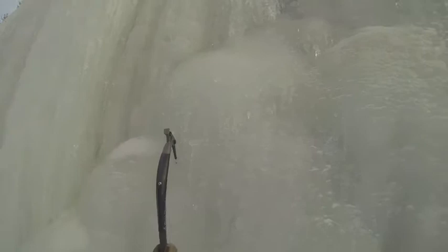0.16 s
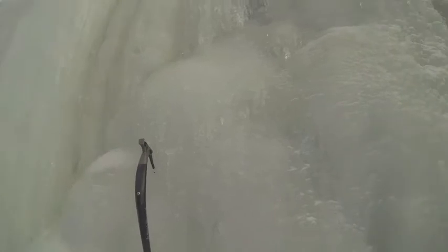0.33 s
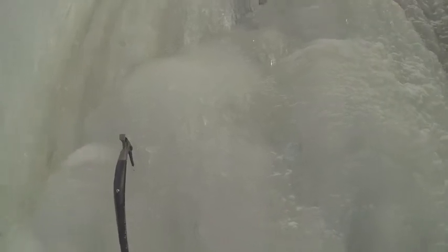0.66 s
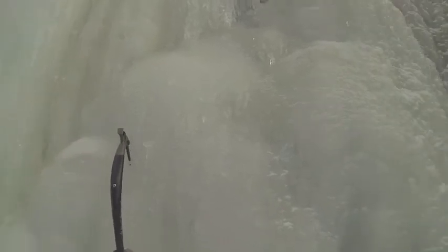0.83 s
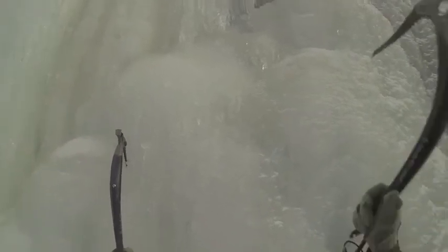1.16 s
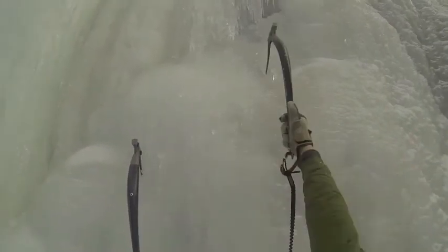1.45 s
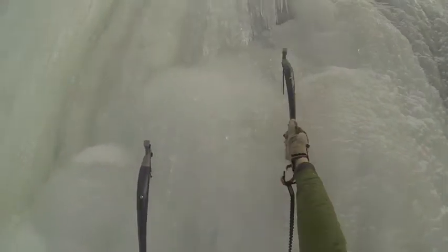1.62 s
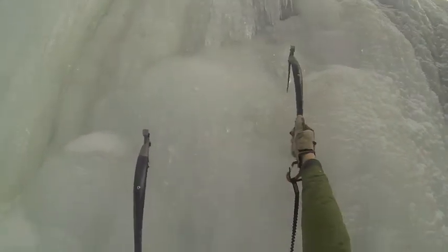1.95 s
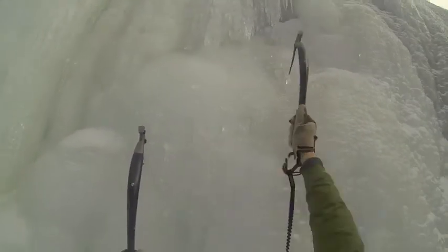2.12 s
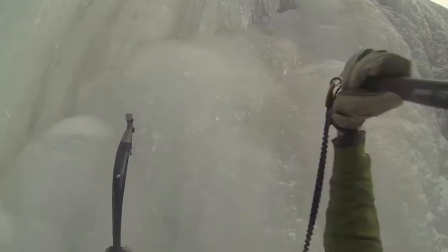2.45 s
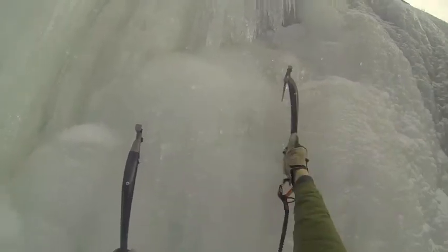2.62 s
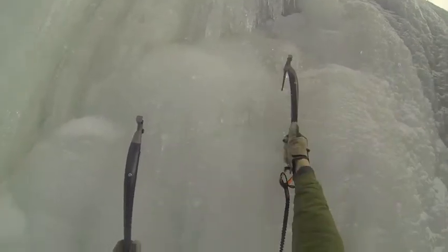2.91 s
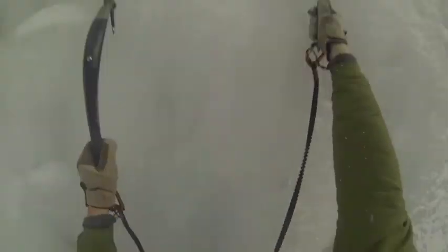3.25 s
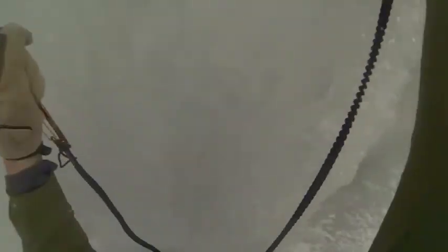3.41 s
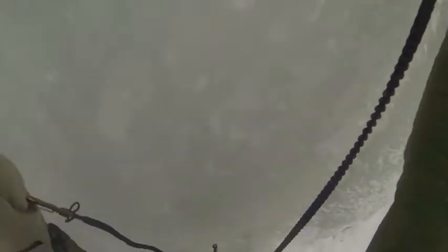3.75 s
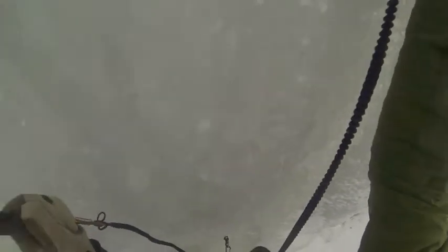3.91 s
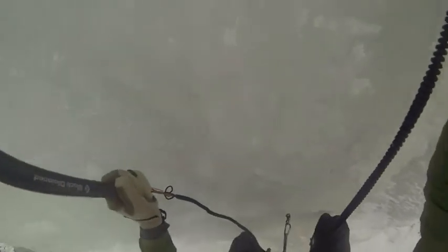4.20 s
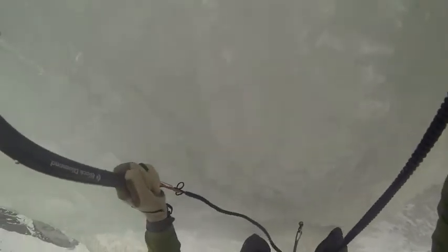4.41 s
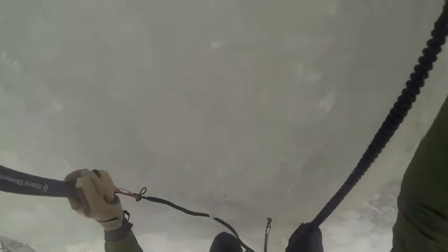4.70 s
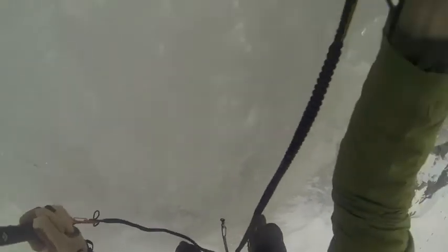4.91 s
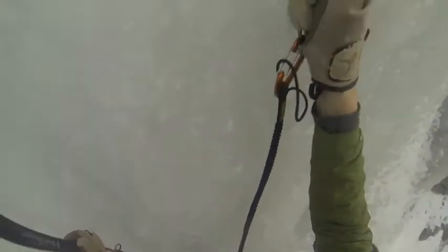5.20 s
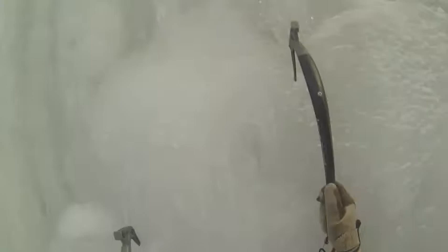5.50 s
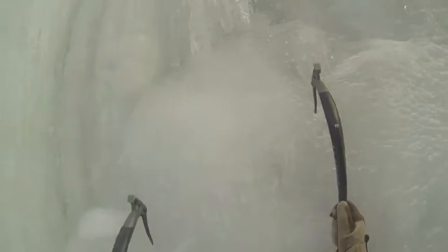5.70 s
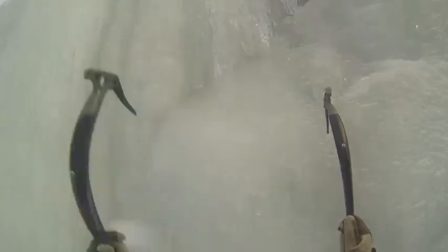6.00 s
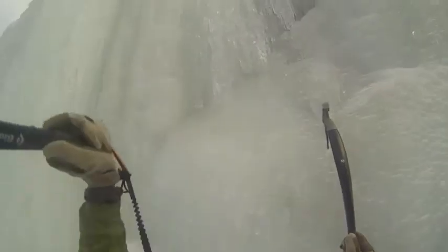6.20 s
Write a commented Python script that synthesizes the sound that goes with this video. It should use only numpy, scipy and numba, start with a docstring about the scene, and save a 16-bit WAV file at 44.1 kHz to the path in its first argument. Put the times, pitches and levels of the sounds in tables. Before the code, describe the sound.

Muffled hollow water hiss inside a helmet case, with crunching ice, small metal clinks, one sharp ringing ice tool blow, then cloth rustles and dull boot knocks.

```python
"""Ice climber on a frozen waterfall

Heard from inside a closed plastic case on the helmet. Running water is shaped noise: it hisses and rings the case.
Crampons crunch in runs of tiny cracks, and metal parts clink with a tick and a short ring.
One ice tool taps lightly, then is driven home with cracks and a ringing knock. Boots knock as decaying noise.
The jacket rustles in tiny creases, sleeves and harness rub as shaped noise, and the moving helmet rumbles.
"""
import sys
import numpy as np
from scipy import signal
from scipy.fft import rfft, irfft, next_fast_len
from scipy.io import wavfile
from numba import njit

SR = 44100
rng = np.random.default_rng(int(sys.argv[2]) if len(sys.argv) > 2 else 0)


def inscribe(sig):
    """Save sig as 16-bit PCM at rate SR to the path in sys.argv[1].

    A 1-D sig is mono; a 2-D sig holds one channel per row.
    Samples are clipped to [-1, 1] before scaling.
    """
    pcm = np.round(np.clip(np.atleast_2d(sig).T, -1, 1) * 32767)
    wavfile.write(sys.argv[1], SR, pcm.astype(np.int16))


N = 280476
T = np.arange(N) / SR  # time in seconds

# In the tables, t60 is the time to fall by 60 dB.
# Spectra give only a colour; the loudness is set separately.

# the water rings the hollow of the case; its level and pitch drift separately as the head turns:
# (t/s, base level/dB, centre f/Hz)
CASE_RING_PATH = [(0, -35, 1564), (0.6, -34, 1538), (1.35, -30.0, 1546), (1.95, -34.5, 1570),
                  (2.2, -35.5, 1565), (2.75, -34, 1635), (3.13, -35.5, 1626), (3.3, -36.5, 1510),
                  (3.7, -38, 1515), (4.4, -38.5, 1492), (5.2, -39, 1512), (5.6, -33, 1480),
                  (6.1, -31, 1466), (6.36, -32.5, 1474)]
# level of the open rush of the water: (t/s, level/dB)
RUSH_LEVEL_PATH = [(0, -53), (0.7, -54), (1.3, -52), (2.75, -48), (3.45, -48), (4.2, -51), (4.85, -54),
                   (5.55, -48.5), (6.36, -50.5)]
# spectrum of the rush of the water outside the ring: (f/Hz, relative level per Hz/dB)
RUSH_SPECTRUM = [(160, -10.5), (520, -6), (760, -4), (935, 2.5), (1000, -5), (1075, 2), (1750, 4),
                 (2040, -6.5), (2320, 0), (2720, -8), (2990, -6), (3280, -14), (3460, -19.5), (4600, -30.5)]
# spectrum of the even hiss behind everything: (f/Hz, relative level per Hz/dB)
FAR_HISS_SPECTRUM = [(100, 15), (1000, 13), (4000, 6), (5000, 5), (6500, 0), (9500, -2), (10600, -6),
                     (11300, -3), (12000, -8), (13200, -8), (15000, -14)]
FAR_HISS_DB = -67
# the main ring lies here and follows a share of each shift of the centre
MAIN_HZ, MAIN_FOLLOWS = 1551.5, 0.31
# as the centre drops, energy passes from the main ring to the lower one
MAIN_DB, MAIN_DB_PER_HZ = -0.86, 0.0442
LOWER_DB, LOWER_DB_PER_HZ = -8.5, -0.0434
# unevenness of the splashing water: steps per second, spread in dB
SPLASH_HZ, SPLASH_DB = 29.87, 1.16

# the climber shifts weight: (start t/s, length/s, helmet rumble level/dB, body and harness level/dB)
WEIGHT_SHIFTS = [(0.153, 0.13, -31, -63.5), (0.422, 0.14, -27.5, -53), (0.797, 0.065, -32, -66),
                 (2.598, 0.26, -31.5, -54), (3.117, 0.31, -45.5, -49.5), (3.582, 0.37, -29, -51.5),
                 (3.954, 0.39, -36, -59), (4.703, 0.18, -63, -63), (5.182, 0.59, -39.5, -55.5)]
SHIFT_ATTACK_S, SHIFT_RELEASE_S = 0.1, 0.068
STILL_RUMBLE_DB, STILL_BODY_DB = -40, -61  # while hanging still
# spectrum of the helmet rumble: (f/Hz, relative level per Hz/dB)
RUMBLE_SPECTRUM = [(3, -9.5), (8, 14.5), (13, 18.5), (17, 17.5), (23, -10), (36, 4), (50, -8), (72, -15.5),
                   (150, -43.5)]
# spectrum of the body and harness: (f/Hz, relative level per Hz/dB)
BODY_SPECTRUM = [(60, -23), (78, -8.5), (97, 0.5), (113, 0), (135, -15), (155, -11.5), (220, -23.5),
                 (500, -42.5)]
# the sleeves rub: (start t/s, length/s, level/dB)
SLEEVE_RUBS = [(2.65, 0.41, -66.5), (3.08, 0.067, -58.5), (3.55, 1.79, -59), (4.25, 0.44, -58)]
RUB_ATTACK_S, RUB_RELEASE_S, STILL_SLEEVE_DB = 0.082, 0.1, -71.5
# spectrum of the sleeves: (f/Hz, relative level per Hz/dB)
SLEEVE_SPECTRUM = [(140, 5), (240, 2), (310, 7.5), (400, -5), (700, -45.5), (1500, -41.5)]
# unevenness of harness and sleeves: steps per second, spread in dB
RUB_FLICKER_HZ, RUB_FLICKER_DB = 14, 2

# steel points crunch in the ice: (t/s, level before the walls/dB, t60/s, treble tilt/dB per octave)
POINT_CRUNCHES = [(0.132, -49, .05, 2.5), (.172, -36.5, .07, 0.5), (.198, -44, 0.029, 3.5),
                  (.225, -51, .05, 1), (.353, -56, 0.034, 4), (0.399, -43.5, 0.026, -1),
                  (0.441, -35.5, 0.05, 2), (0.474, -38.5, 0.064, -0.5), (.501, -44, 0.037, 3.5),
                  (.529, -66, 0.069, -3), (.712, -41, 0.072, 6), (0.725, -47, 0.034, 5),
                  (0.84, -42.5, 0.038, -2), (3.238, -43, 0.097, -8), (3.323, -40.5, 0.056, -7.5),
                  (4.236, -50.5, 0.11, 2.5), (4.258, -38.5, 0.05, -10), (4.774, -61, 0.11, 10),
                  (5.089, -56, 0.054, 20), (5.164, -57.5, .07, 18)]
# a loaded crampon grinds off crumbs of ice: (start t/s, length/s, middle level before the walls/dB)
CRAMPON_GRINDS = [(0.409, .12, -50), (0.812, .13, -68), (5.568, .14, -62.5)]
CRUMBS_PER_S, CRUMB_SPREAD_DB = 55, 5
CRUMB_T60_S, CRUMB_TILT_DB = 0.028, 1.5  # tilt per octave
# spectrum of cracking ice, before tilting: (f/Hz, relative level per Hz/dB)
CRACK_SPECTRUM = [(310, -48.5), (610, -22.5), (1520, 12), (2250, 6.5), (3280, 3), (3760, -3.5), (4420, -4),
                  (5320, -3), (5960, -5), (6620, -9), (7520, -11.5), (10100, -18), (11400, -24.5),
                  (12900, -26.5), (14800, -29.5)]
# the walls of the case ring with cracks and taps: (f/Hz, width/Hz, level/dB)
CASE_WALL_MODES = [(3020, 90, -0.5), (3330, 80, 3.5), (4050, 120, 1.5), (4930, 190, -1), (5310, 110, 3),
                   (6560, 70, 4.5), (7240, 47, 0.5), (7800, 130, 4.5), (8270, 140, -2)]
WALL_DIRECT_DB = -4

# the stiff jacket slides and creases: (start t/s, length/s, level/dB)
JACKET_RUSTLES = [(.16, 0.5, -80), (3.25, 0.55, -66), (3.85, 1.54, -76.5), (5.62, 0.069, -72)]
RUSTLE_ATTACK_S, RUSTLE_RELEASE_S = 0.08, 0.053
# spectrum of the sliding cloth: (f/Hz, relative level per Hz/dB)
SLIDE_SPECTRUM = [(1500, -12), (3100, -3), (4200, -3), (5200, -2), (6500, -1), (9000, 0), (11000, 1),
                  (12400, -6), (14800, -11)]
CREASES_PER_S, CREASE_SPREAD_DB = 200, 20
CREASE_T60_S, CREASE_TILT_DB = 0.013, 8  # each crease takes 0.5 to 1.5 times these
SLIDE_DB = -10.5  # against the creases

# clips, buckles and screws touch: (t/s, tick level/dB, ring f/Hz, ring against tick/dB, tick tilt/dB per octave)
METAL_CLINKS = [(1.256, -41, 4840, -2, 1.5), (1.694, -54, 4950, -6, 2), (2.373, -35.5, 4300, -5.5, 3.5),
                (2.533, -42.5, 5160, -3.5, 3), (2.579, -37, 5150, -5.5, 1.5), (2.609, -39, 8300, -17, 12),
                (2.899, -58, 6420, -8, 16.5), (3.208, -47.5, 5660, -11, 6), (3.272, -36.5, 2870, 4.5, -2),
                (3.289, -59, 7940, -15, 8), (3.368, -61, 7900, -16, 13), (3.392, -55, 7400, -8, 8),
                (3.409, -49, 6640, 3, -1), (3.431, -52, 7950, -15, 5), (3.482, -29.5, 3130, 4.5, 2),
                (3.599, -50, 8040, -13, 0), (3.668, -56, 7900, -9, 11), (3.732, -47, 5150, -9, 1),
                (3.74, -51, 10900, -13, 7), (3.976, -57, 8000, -16, 12), (4.346, -53, 8400, -9, 3),
                (4.692, -59, 9800, -10, 10)]
# close modes of a clip and its gate: (frequency ratio, gain; both plain numbers)
METAL_MODES = [(.87, .45), (.94, -.6), (1, 1), (1.07, -.7), (1.15, .45)]
CLINK_TICK_T60_S, CLINK_RING_T60_S = 0.019, 0.024

# the pick is first set lightly on the ice and skips once: (t/s, level before the walls/dB)
PICK_TAPS = [(1.586, -38), (1.589, -33)]
# what the lightly held tool rings with: (f/Hz, relative level/dB, t60/s)
TAP_MODES = [(2265, 2, 0.048), (3130, -10, 0.049), (3560, -22, 0.044), (4120, -22, 0.028),
             (4425, -18, 0.055), (4870, -9.5, 0.025), (7564, -40, 0.073), (8100, -28, 0.033),
             (9948, -16, 0.039)]
TAP_RING_DB = 0.5  # added to the mode levels
TAP_CRACK_T60_S, TAP_TILT_DB = 0.04, -3  # tilt per octave

# the pick bites, drives in and splits off chips:
# (t/s, level before the filter and walls/dB, t60/s, tilt/dB per octave)
BLOW_CRACKS = [(2.6, -36, 0.044, 2), (2.6095, -18.5, 0.011, 3), (2.6113, -13, 0.047, -4.5),
               (2.616, -28, 0.014, 24), (2.624, -38, 0.019, 17), (2.626, -47, .035, 2)]
CRACK_LOW_HZ = 1900
# what the blow rings: (f/Hz, relative level/dB)
BLOW_MODES = [(595, -23), (949, -14), (1075, -13.5), (1445, 0), (1690, -3), (1850, -5), (2150, -16),
              (2555, -14), (2990, -13), (3350, -12), (4800, -20), (5300, -20), (6590, -18), (7500, -21)]
BLOW_S, BLOW_DB, BLOW_PUSH_S, BLOW_T60_S = 2.6115, -11, 0.0015, 0.04

# jolts carried through the body to the helmet: (t/s, level/dB, pitch f/Hz, length/s)
HELMET_JOLTS = [(2.636, -25.5, 46, 0.032), (4.25, -24, 64, 0.06), (4.296, -23.5, 21.7, 0.073),
                (4.702, -44, 90, 0.035), (5.184, -24.5, 44.4, 0.037), (5.205, -20.5, 14.7, .1),
                (5.686, -36, 34, 0.074)]

# a boot kicks or nudges the ice and the knock comes up through the body: (t/s, level/dB, t60/s)
BOOT_KICKS = [(4.239, -33.5, 0.3), (4.69, -48, .15), (5.16, -40.5, .4)]
KICK_ATTACK_S = 0.0099
# spectrum of the boot knock: (f/Hz, relative level per Hz/dB)
KNOCK_SPECTRUM = [(60, -13), (105, 12), (150, -11), (220, -16), (330, -22), (620, -23), (1000, -21)]


def amp(db):
    """Turn decibels into a gain."""
    return 10 ** (np.asarray(db) / 20)


def unit(x):
    """Scale a sound to an rms of 1."""
    return x / np.sqrt(np.mean(x ** 2))


def curves(rows):
    """Draw one line in time for each column of a table."""
    s, *columns = np.transpose(rows)
    return [np.interp(T, s, column) for column in columns]


def add(out, s, sound):
    """Mix a sound in at a time in seconds."""
    i = int(s * SR)
    out[i:i + len(sound)] += sound[:N - i]


def fade(t, t60):
    """Die away exponentially, by 60 dB in t60 seconds."""
    return np.exp(-np.log(1000) * t / t60)


def flicker(hz, db):
    """A gain that wanders at random, with hz new steps a second."""
    steps = rng.standard_normal(size=1024)
    return amp(db * np.interp(T * hz, np.arange(len(steps)), steps))


def moves(rows, attack_s, release_s):
    """Gain of a series of movements: each swells, holds and dies away; their powers add."""
    power = np.zeros(N)
    for s, length, db in rows:
        corners = [s - attack_s, s, s + length, s + length + release_s]
        power += (amp(db) * np.interp(T, corners, [0, 1, 1, 0])) ** 2
    return np.sqrt(power)


def gain_db(points, hz):
    """Read a spectrum on a log-frequency axis; it falls steeply beyond its last point."""
    f, db = np.transpose(points)
    octave = np.log2(hz + 1)
    beyond = np.maximum(octave - np.log2(f[-1]), 0)
    return np.interp(octave, np.log2(f), db) - 36 * beyond


def noise(points):
    """Noise coloured by a spectrum, at an rms of 1."""
    size = next_fast_len(N)
    gain = amp(gain_db(points, np.fft.rfftfreq(size, 1 / SR)))
    white = rng.standard_normal(N)
    return unit(irfft(rfft(white, size) * gain, size)[:N])


def response(points, tilt_db, size=512):
    """A short click with a tilted spectrum, its energy as early as possible and equal to 1."""
    hz = np.fft.rfftfreq(size, 1 / SR)
    db = gain_db(points, hz) + tilt_db * np.log2(np.clip(hz, 2000, 9000) / 5000)
    # folding the cepstrum (the spectrum of the log spectrum) gives minimum phase
    cepstrum = irfft(np.log(amp(db)))
    cepstrum[1:size // 2] *= 2
    cepstrum[size // 2 + 1:] = 0
    click = irfft(np.exp(rfft(cepstrum)))
    return click / np.linalg.norm(click)


@njit
def resonate(x, hz, width):
    """State-variable band-pass whose centre may move."""
    y, band, low = np.empty(len(x)), 0., 0.
    for i in range(len(x)):
        g, k = np.tan(np.pi * hz[i] / SR), width / hz[i]
        v = (band + g * (x[i] - low)) / (1 + g * (g + k))
        band, low, y[i] = 2 * v - band, low + 2 * g * v, k * v
    return y


def ring(hz, width_hz, skirt_hz):
    """Noise in a narrow resonance, its skirts cut by a wider one."""
    centre = hz + np.zeros(N)
    narrow = resonate(rng.standard_normal(N), centre, float(width_hz))
    return unit(resonate(narrow, centre, float(skirt_hz)))


def fracture(t60, tilt_db):
    """A dying run of tiny cracks of uneven size, coloured by the ice spectrum."""
    t = T[:SR // 8]
    envelope = fade(t, t60)
    cracks = rng.standard_normal(len(t)) * rng.exponential(size=len(t)) * envelope
    burst = signal.fftconvolve(cracks, response(CRACK_SPECTRUM, tilt_db))[:len(t)]
    # give the burst the same energy as its envelope
    return burst * np.linalg.norm(envelope) / np.linalg.norm(burst)


def walls(x):
    """Sharp sounds reach the inside of the case partly straight, partly through its ringing walls."""
    out = amp(WALL_DIRECT_DB) * x
    for hz, width, db in CASE_WALL_MODES:
        out = out + amp(db) * resonate(x, hz + np.zeros(N), float(width))
    return out


def water():
    """Rushing water is noise; the case rings at close pitches, whose balance shifts as the head turns."""
    ring_db, centre_hz = curves(CASE_RING_PATH)
    rush_db, = curves(RUSH_LEVEL_PATH)
    shift_hz = centre_hz - MAIN_HZ
    main_hz = MAIN_HZ + MAIN_FOLLOWS * shift_hz
    main_db = ring_db + MAIN_DB + MAIN_DB_PER_HZ * shift_hz
    lower_db = ring_db + LOWER_DB + LOWER_DB_PER_HZ * shift_hz
    main = amp(main_db) * ring(main_hz, width_hz=98, skirt_hz=258)
    shoulder = amp(main_db - 9.5) * ring(1.11 * main_hz, width_hz=90, skirt_hz=160)
    lower = amp(lower_db) * ring(1376.6, width_hz=73, skirt_hz=190)
    case = (main + shoulder + lower) * flicker(SPLASH_HZ, SPLASH_DB)
    rush = amp(rush_db) * noise(RUSH_SPECTRUM)
    return case + rush + amp(FAR_HISS_DB) * noise(FAR_HISS_SPECTRUM)


def climber():
    """With each shift of weight the helmet sways and the harness strains; the sleeves rub as the arms work."""
    shifts = np.array(WEIGHT_SHIFTS)
    sway_moves = moves(shifts[:, [0, 1, 2]], SHIFT_ATTACK_S, SHIFT_RELEASE_S)
    strain_moves = moves(shifts[:, [0, 1, 3]], SHIFT_ATTACK_S, SHIFT_RELEASE_S)
    rub_moves = moves(SLEEVE_RUBS, RUB_ATTACK_S, RUB_RELEASE_S)
    # hypot adds the power of a movement to the level at rest
    sway = np.hypot(amp(STILL_RUMBLE_DB), sway_moves) * noise(RUMBLE_SPECTRUM)
    strain = np.hypot(amp(STILL_BODY_DB), strain_moves) * noise(BODY_SPECTRUM)
    rub = np.hypot(amp(STILL_SLEEVE_DB), rub_moves) * noise(SLEEVE_SPECTRUM)
    return sway + (strain + rub) * flicker(RUB_FLICKER_HZ, RUB_FLICKER_DB)


def crampons():
    """Ice crunches in short fractures as the points shift and kick, and sheds loose crumbs as they grind."""
    out = np.zeros(N)
    for s, db, t60, tilt_db in POINT_CRUNCHES:
        add(out, s, amp(db) * fracture(t60, tilt_db))
    for s, length, db in CRAMPON_GRINDS:
        for when in np.arange(0, length, 1 / CRUMBS_PER_S):
            crumb_db = db + CRUMB_SPREAD_DB * rng.standard_normal()
            crumb = amp(crumb_db) * fracture(CRUMB_T60_S, CRUMB_TILT_DB)
            add(out, s + when + rng.random() / CRUMBS_PER_S, crumb)
    return out


def jacket():
    """Cold cloth slides with a faint hiss and snaps in separate tiny creases."""
    slide = amp(SLIDE_DB) * noise(SLIDE_SPECTRUM)
    creases = np.zeros(N)
    count = int(CREASES_PER_S * T[-1])
    for when, size, length, bright in rng.random(size=(count, 4)):
        snap = fracture(CREASE_T60_S * (0.5 + length), CREASE_TILT_DB * (0.5 + bright))
        # squaring makes most creases small
        add(creases, when * T[-1], amp(CREASE_SPREAD_DB * size ** 2) * snap)
    cloth = unit(slide + unit(creases))
    return moves(JACKET_RUSTLES, RUSTLE_ATTACK_S, RUSTLE_RELEASE_S) * cloth


def hardware():
    """A hard tick, then a brief ring of the metal part that was touched."""
    out, t = np.zeros(N), T[:SR // 8]
    for s, db, hz, ring_db, tilt_db in METAL_CLINKS:
        modes = sum(gain * np.sin(2 * np.pi * hz * ratio * t) for ratio, gain in METAL_MODES)
        # webbing and gloves damp the metal quickly
        metal = amp(ring_db) * modes * fade(t, CLINK_RING_T60_S)
        tick = fracture(CLINK_TICK_T60_S, tilt_db)
        add(out, s, amp(db) * (tick + metal))
    return out


def tool_tap():
    """A light touch of the pick: the surface barely cracks and the steel rings freely."""
    out, t = np.zeros(N), T[:SR // 8]
    steel = sum(amp(db) * np.sin(2 * np.pi * hz * t) * fade(t, t60) for hz, db, t60 in TAP_MODES)
    for s, db in PICK_TAPS:
        crack = fracture(TAP_CRACK_T60_S, TAP_TILT_DB)
        add(out, s, amp(db) * (crack + amp(TAP_RING_DB) * steel))
    return out


def ice_tool():
    """The pick cracks the surface; when it stops dead the blow rings tool, ice and case."""
    cracks, t = np.zeros(N), T[:SR // 6]
    for s, db, t60, tilt_db in BLOW_CRACKS:
        add(cracks, s, amp(db) * fracture(t60, tilt_db))
    # keep the cracks bright, so that the ringing modes carry the low part of the blow
    high_pass = signal.butter(2, CRACK_LOW_HZ, "high", fs=SR, output="sos")
    out = walls(signal.sosfilt(high_pass, cracks))
    # neighbouring modes start in opposite directions, so the knock swells over a few cycles
    knock = np.zeros(len(t))
    for k, (hz, db) in enumerate(BLOW_MODES):
        knock += (-1) ** k * amp(db) * np.sin(2 * np.pi * hz * t)
    push = np.minimum(t / BLOW_PUSH_S, 1)
    add(out, BLOW_S, amp(BLOW_DB) * knock * fade(t, BLOW_T60_S) * push)
    return out


def thuds():
    """Each jolt rocks the helmet as a short, low sine that swells and fades."""
    out = np.zeros(N)
    for s, db, hz, length in HELMET_JOLTS:
        t = T[:int(length * SR)]
        swell = np.sin(np.pi * t / length) ** 2
        add(out, s, amp(db) * np.sin(2 * np.pi * hz * t) * swell)
    return out


def kicks():
    """The dull knock of each boot, carried by legs and spine, is low noise that dies away."""
    gain = np.zeros(N)
    for s, db, t60 in BOOT_KICKS:
        attack = np.clip((T - s) / KICK_ATTACK_S, 0, 1)
        gain += amp(db) * attack * fade(np.maximum(T - s, 0), t60)
    return gain * noise(KNOCK_SPECTRUM)


def scene():
    """The closed case makes everything central; only the sharp blow leans a little to the left."""
    lean_db = 0.2  # up on the left, down on the right
    blow = amp([[lean_db], [-lean_db]]) * ice_tool()
    steady = water() + climber()
    sharp = walls(crampons() + tool_tap())
    return blow + steady + sharp + jacket() + hardware() + thuds() + kicks()


def record(dry):
    """The camera cuts the top: a steep low-pass filter."""
    low_pass = signal.ellip(10, 0.2, 80, 14950, fs=SR, output="sos")  # 0.2 dB ripple, 80 dB cut, edge in Hz
    return signal.sosfilt(low_pass, dry)


dry = scene()
out = record(dry)
inscribe(out)
```